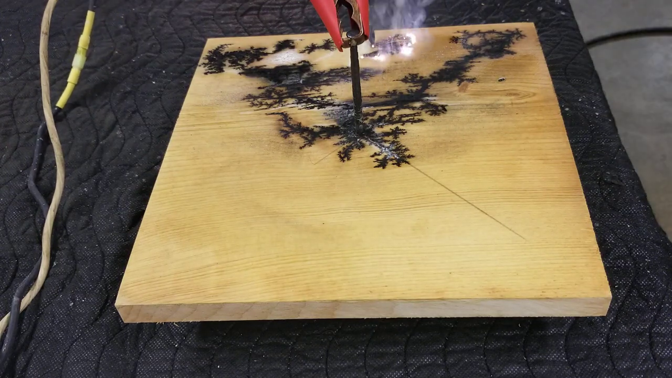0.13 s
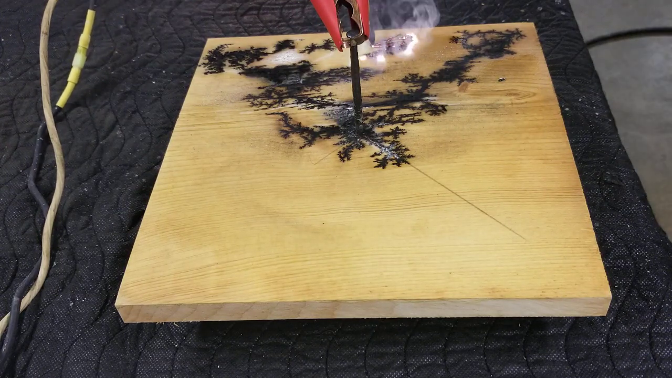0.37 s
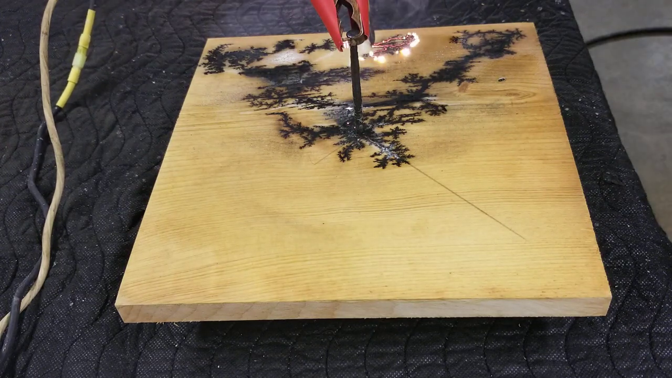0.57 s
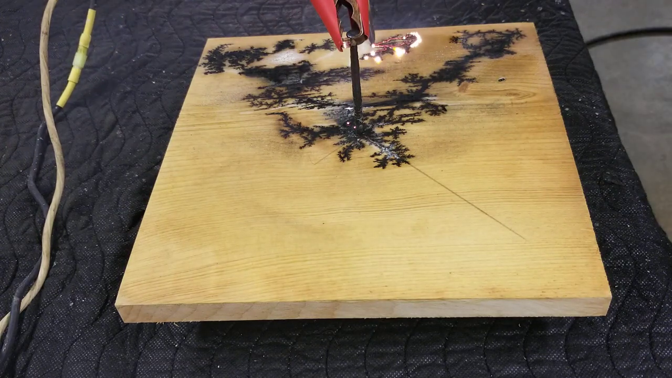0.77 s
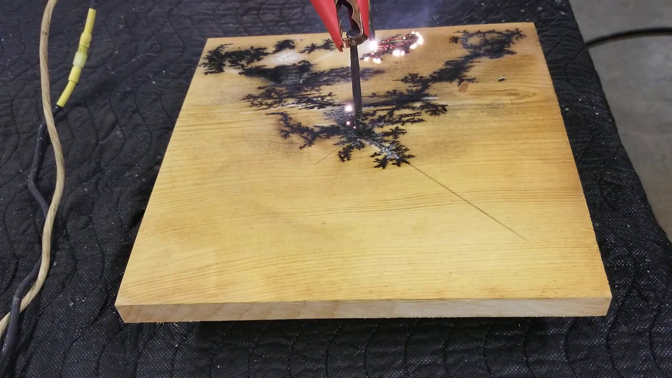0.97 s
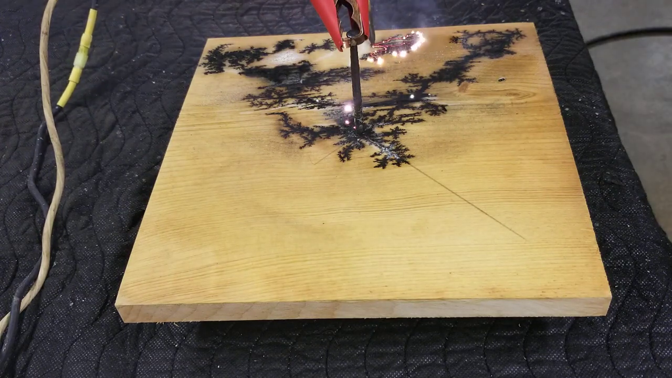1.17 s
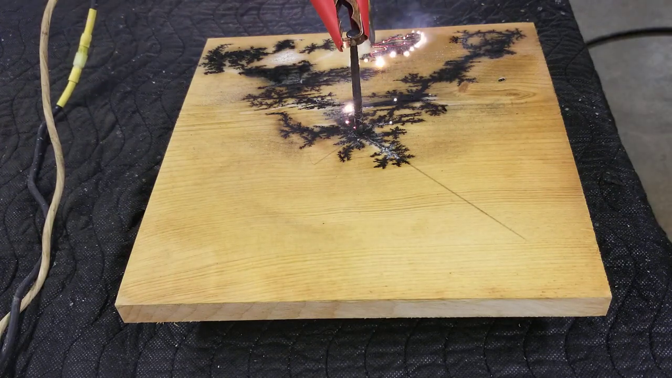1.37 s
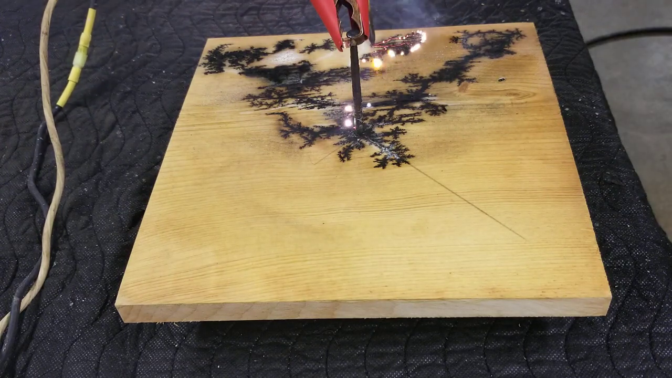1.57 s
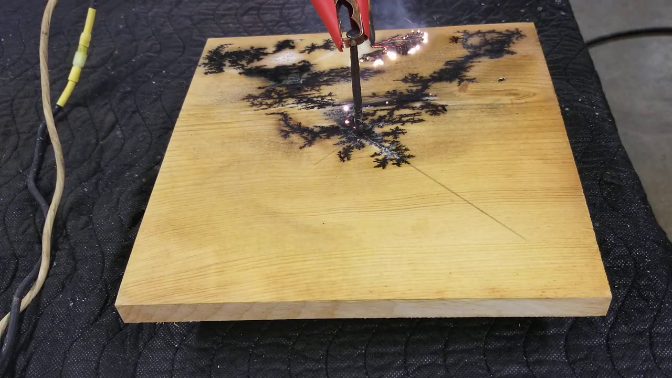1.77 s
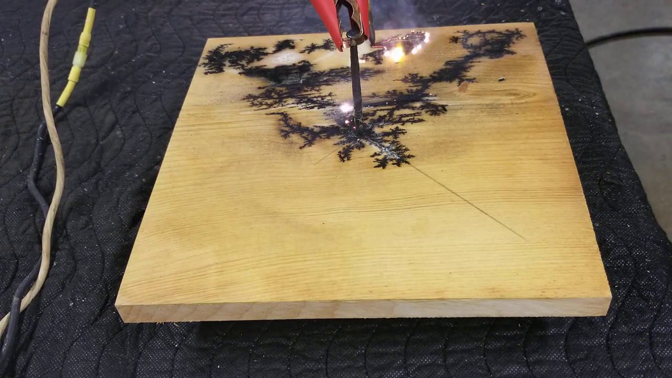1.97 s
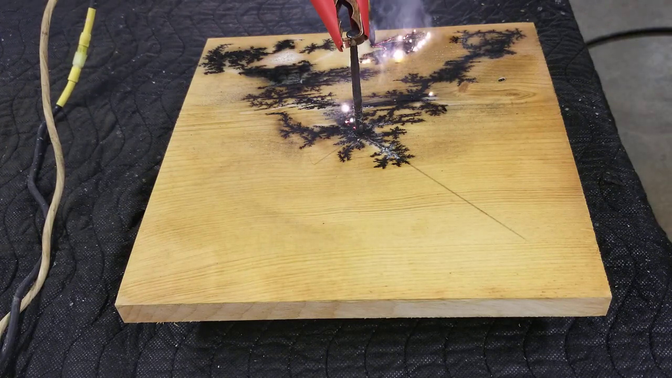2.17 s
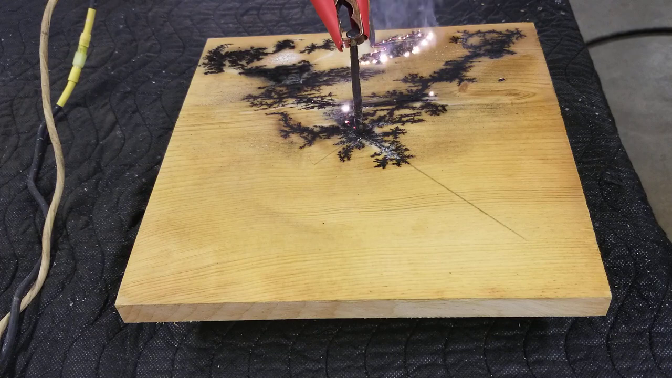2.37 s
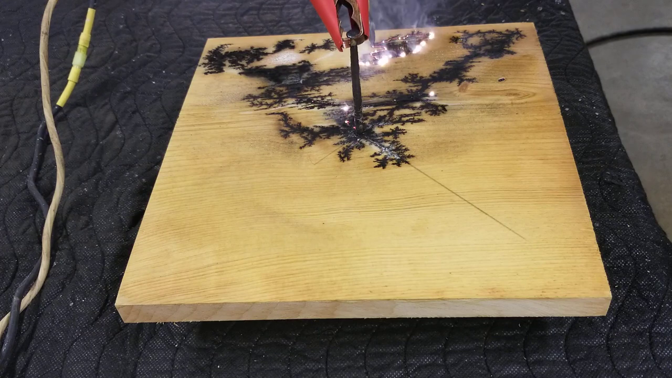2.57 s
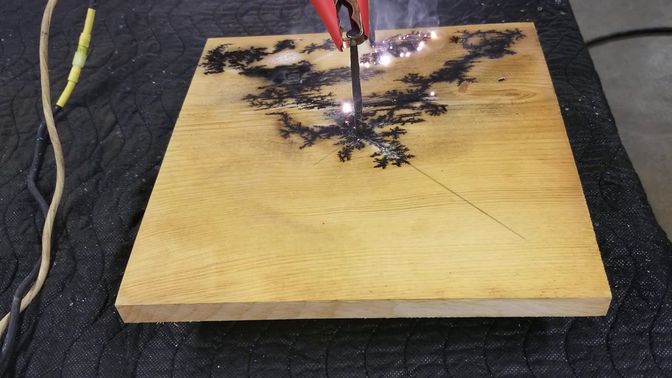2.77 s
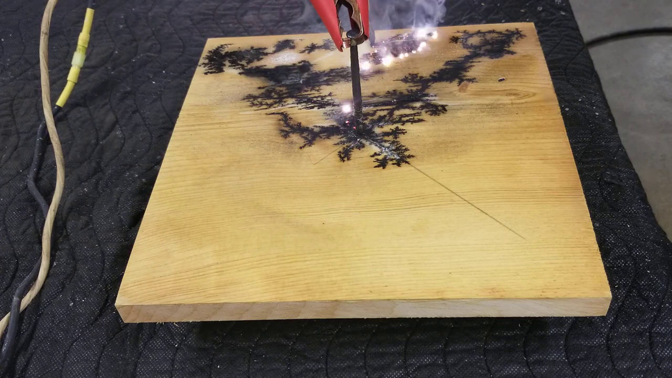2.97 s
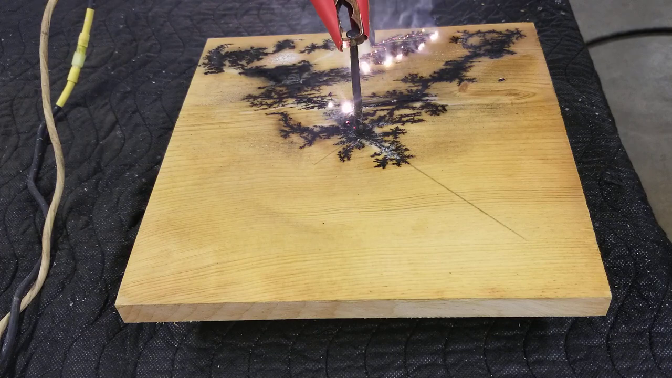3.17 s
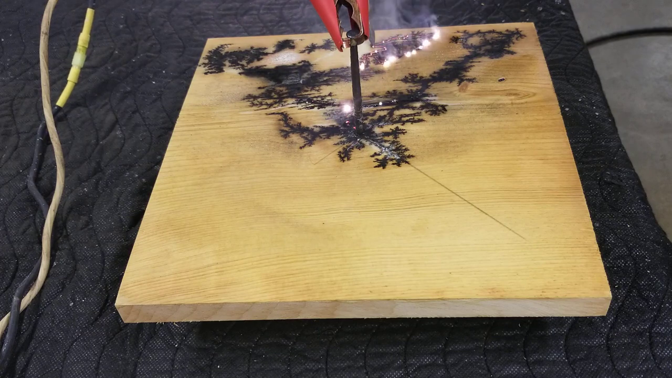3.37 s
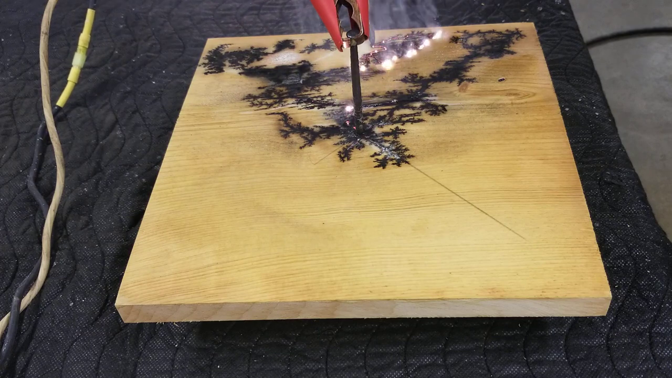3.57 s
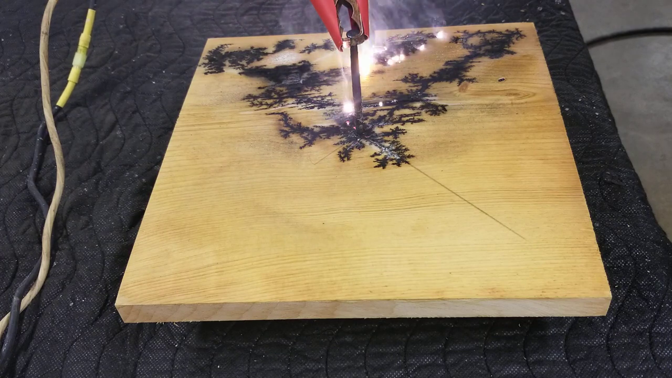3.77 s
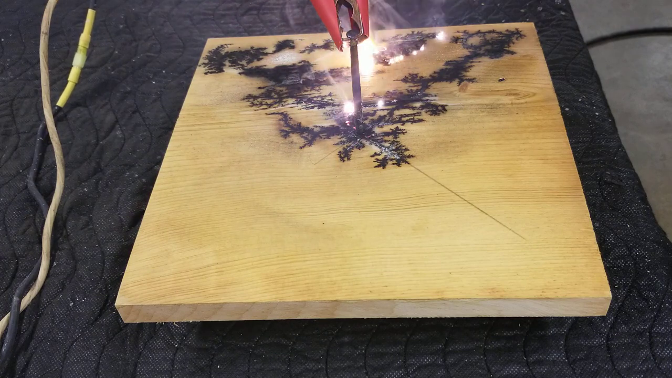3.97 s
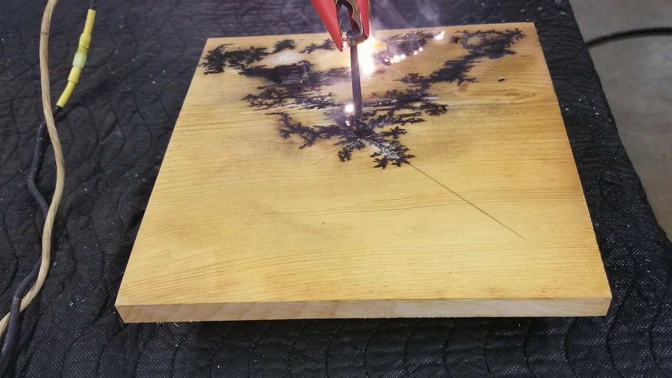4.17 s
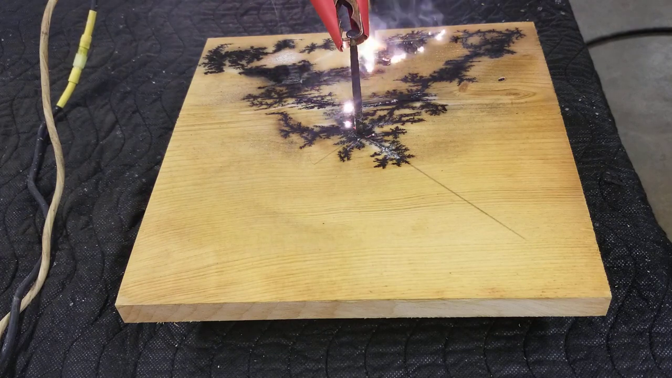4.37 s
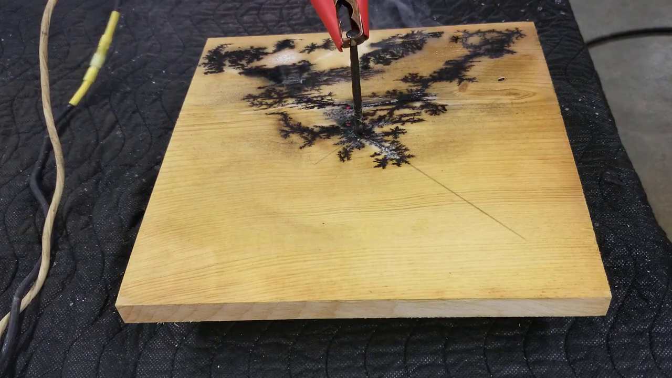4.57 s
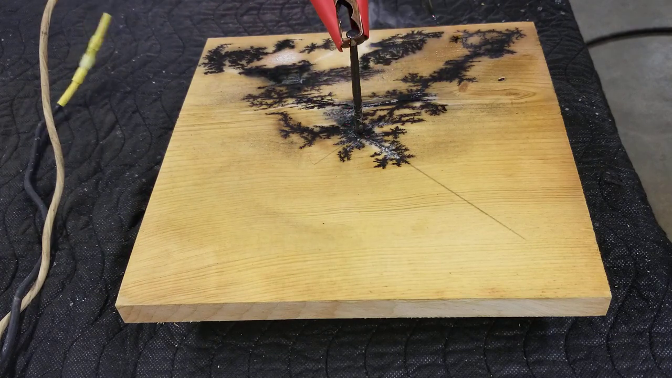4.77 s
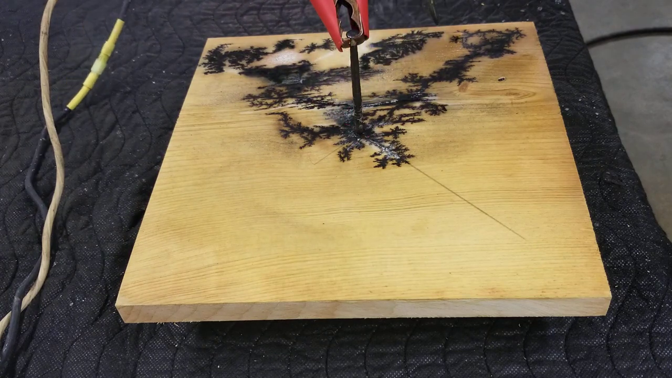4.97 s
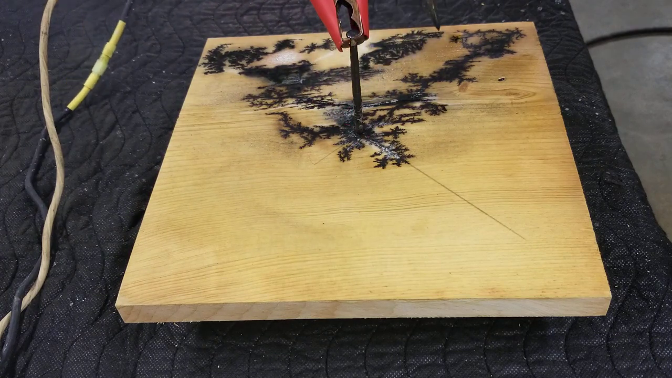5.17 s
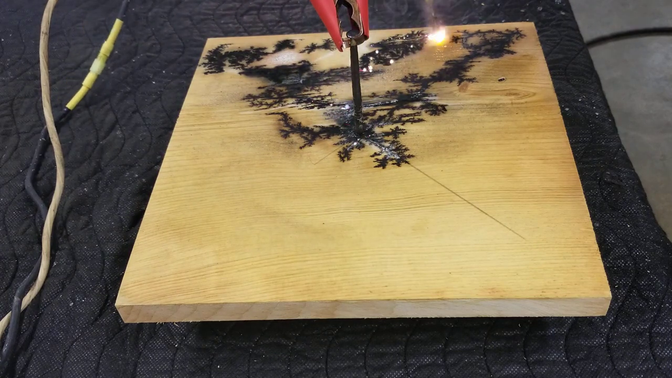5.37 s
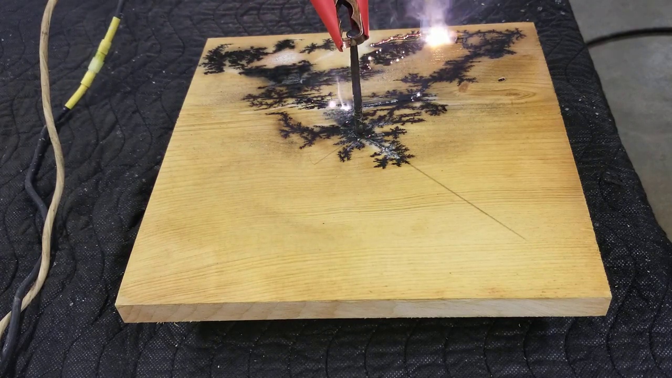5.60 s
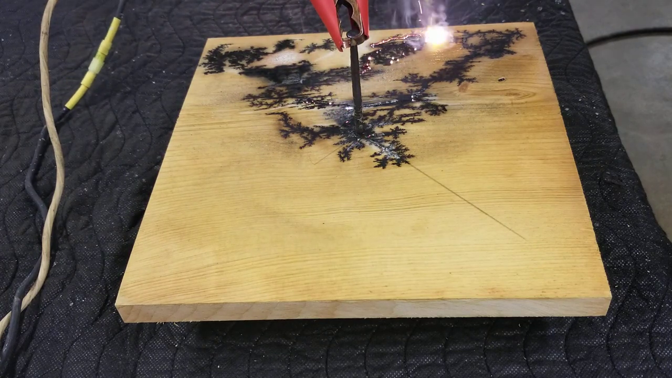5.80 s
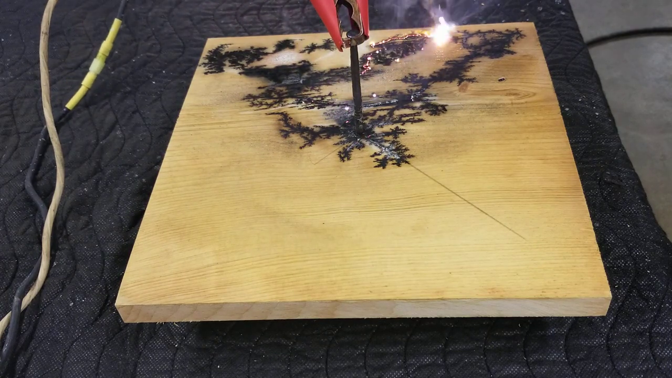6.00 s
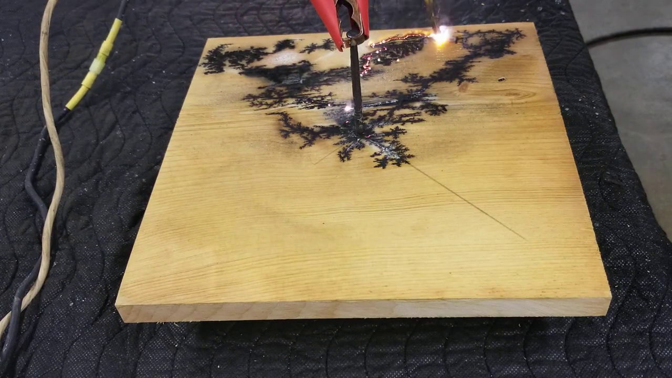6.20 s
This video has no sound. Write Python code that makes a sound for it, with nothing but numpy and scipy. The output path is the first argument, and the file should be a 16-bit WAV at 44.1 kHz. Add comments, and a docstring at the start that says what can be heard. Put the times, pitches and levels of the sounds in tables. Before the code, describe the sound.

From the start, wet wood under high voltage gives a harsh, very bright fizzing buzz: bursts of tiny clicks repeating about sixty times a second, each slightly different. Near 0.2 s an open arc briefly snaps and drones; around 0.5 s the sizzle swells, dips near 1 s, then flares repeatedly until 2 s, with isolated steam cracks near 1.3, 1.8, 2.8 and 3.5 s. From about 3.6 to 4.4 s the fizz thins while rough arc sputter and low buzzing drone come forward. At 4.4 s the burning cuts out, leaving softer transformer hum and two steady, gently beating fans with airflow. At 5.23 s it catches with a short buzzing thump, strong fizz and several hard cracks, then keeps crackling unevenly with arc snaps, pops and flares to the end, around 6.3 s. Close stereo pickup, the hiss brighter on the left, with a short, faint workshop reverberation.

```python
"""A small workshop, where mains high voltage burns branching tracks into a wet pine board.
Once a mains cycle the damp track spits a burst of tiny sparks: random clicks coloured as fizz and crackle.
Open arcs snap and sputter in bursts of clicks and drone at mains harmonics; steam pockets crack.
The track goes out for a moment, then catches again with a short buzzing thump.
Behind it a transformer hums in mains harmonics under its load, and two fans run as tones over noise."""
import sys
import numpy as np
from scipy import signal
from scipy.fft import rfft, irfft
from scipy.io import wavfile
from scipy.ndimage import uniform_filter1d

SR = 44100
rng = np.random.default_rng(int(sys.argv[2]) if len(sys.argv) > 2 else 0)


def persist_wave(psi):
    """Save psi, clipped to +-1, as 16-bit WAV."""
    counts = np.round(np.clip(psi, -1, 1) * 32767).astype(np.int16)
    wavfile.write(sys.argv[1], SR, np.atleast_2d(counts).T)


N = 275184

# Motor and fan blade tones: (frequency [Hz], mean level [dB])
FAN_TONES = [(55.05, -70), (56.23, -61.5), (58.59, -63), (101.8, -66), (112.46, -64), (435.04, -56),
             (449.72, -60), (543.84, -67), (562.13, -70), (618.66, -76.5), (870.12, -78.5), (1087.64, -74),
             (1124.27, -75), (1413.96, -76)]
# Rush of air from the fans: (frequency [Hz], density [dB per Hz])
AIR_RUSH = [(20, -86), (45, -97), (80, -78), (115, -73.5), (165, -83.5), (265, -75), (330, -81.5),
            (420, -78.5), (720, -87.5), (950, -89), (1120, -90.5), (1300, -92), (2200, -96.5), (3600, -100),
            (7500, -112), (9600, -108), (15500, -113)]
# Transformer hum, a row per mains harmonic from the second up: (level at load 0 [dB], level at load 1 [dB])
HUM_HARMONICS = [(-51, -44), (-66, -70), (-60, -55), (-90, -75.5), (-88, -70)]
# Spells in which the track conducts: (start [s], end [s], lag of left port [ms], left minus right [dB])
BURNS = [(0, 4.396, .057, -.8), (5.233, 6.3, .091, -2.1)]
# How hard the track burns: (time [s], burning strength [dB])
BURN_STRENGTH = [(0.01, -0.9), (0.21, -7.1), (0.46, 4.5), (0.96, -4.5), (1.11, 4.5), (1.91, -0.4),
                 (2.26, -0.3), (2.41, -3.5), (2.61, 0.8), (2.71, -2.5), (2.81, 4), (3.36, 1.2), (3.56, 4.5),
                 (3.81, -7.5), (4.11, -0.5), (4.16, -5), (4.31, 1.5), (4.39, -3.5), (5.24, 7), (5.39, -1),
                 (5.49, -0.7), (6.04, -4.5), (6.09, -0.7), (6.23, -5.5)]
# Brief flares as the track reaches a wet spot, a few of them dips: (time [s], extra strength [dB])
FLARES = [(.239, 7), (.339, 1.5), (.672, -1.5), (1.089, 0.5), (1.289, 6), (1.49, 4), (1.556, 6),
          (1.756, 5.5), (1.79, 7.5), (1.856, 5), (2.257, 3.5), (2.79, -1), (5.441, 3.5), (5.491, 5),
          (5.592, 4.5), (5.775, 6), (6.008, 6.5), (6.092, 3)]
# Open arc, before the trims of snap and drone: (time [s], forward half cycle [dB], reverse half cycle [dB])
ARC_STRENGTH = [(.18, -72, -76), (.21, -64, -53), (.32, -72, -62), (.5, -71.5, -61.5), (3.45, -77, -71),
                (3.65, -57.5, -61), (4.2, -62, -57.5), (4.35, -62, -63), (5.24, -65, -64),
                (5.5, -94, -57.5), (6.24, -89, -70)]
# Pockets of steam bursting in the char: (time [s], click size before colouring [dB])
STEAM_CRACKS = [(1.2912, -20.5), (1.8396, -17.5), (2.8238, -21), (3.5069, -20), (5.258, -14),
                (5.2753, -11.5), (5.3249, -27), (5.5081, -14.5), (5.5748, -24), (5.975, -21), (6.058, -20),
                (6.1577, -18)]
# Colour of the steam cracks: (frequency [Hz], gain [dB])
CRACK_COLOUR = [(100, 3), (400, -17), (1500, 6), (3500, 5), (7000, 7.5), (16000, 13.5)]
# Colour of the escaping steam, before scaling: (frequency [Hz], relative gain [dB])
FIZZ_COLOUR = [(600, -26.5), (2000, -29.5), (5000, -12), (8000, -11), (8700, -7), (9450, -3), (10300, -1),
               (11600, -1), (13000, 1), (15600, 1.5), (16500, -46)]
# Colour of the crackling char, before scaling: (frequency [Hz], relative gain [dB])
CRACKLE_COLOUR = [(200, -10), (700, -13), (1150, 1.5), (1700, 2.5), (2300, 2.5), (2750, 0), (3300, 3.5),
                  (4500, -1), (7000, -4), (10000, -25), (16000, -14)]
# Colour of the arc snaps, before scaling: (frequency [Hz], relative gain [dB])
SNAP_COLOUR = [(150, -9.5), (500, -17.5), (1100, -4), (1600, -3), (2500, -7.5), (5000, -13), (9000, -6.5),
               (16000, 1)]
# Balance of the microphone ports, the left ringing near 9.5 kHz: (frequency [Hz], left minus right [dB])
PORT_BALANCE = [(60, 0.5), (120, 1.6), (220, 0.5), (420, 4.5), (1200, 4), (2400, 2), (5000, 3.5),
                (8000, -0.5), (8700, 6), (9450, 18), (10400, 7.5), (11600, 5.5), (13000, 3.5), (15500, 5.5)]

MAINS_HZ = 59.972
FIRST_PEAK_S = .0056  # first voltage peak
TIME = np.arange(N) / SR
FREQ = np.maximum(np.arange(N // 2 + 1) * SR / N, 1)
RELIGHT_S = BURNS[1][0]
RELIT = TIME >= RELIGHT_S

FIZZ_DB, CRACKLE_DB = -39.5, -55  # base levels, before burning strength and scatter
CRACKLE_SLOPE = .67  # dB of crackle for each dB of burning strength
RELIGHT_CRACKLE_DB = 3  # the second burn crackles harder
FLICKER_DB, RELIGHT_FLICKER_DB = 1.07, 2.1  # scatter from cycle to cycle in the first and second burn
FLARE_S = 0.0024  # half length of a flare
LOAD, RELIGHT_LOAD = 0.5, 0.39  # base load in the first and second burn
LOAD_PER_DB = 0.05  # load added per dB of burning
LOAD_SMOOTHING_S = .06  # length of the smoothing of the load
INRUSH_DB, INRUSH_SLOPE_DB = -48, -1  # second harmonic before the swell; step to each next harmonic
INRUSH_S = 0.021  # decay time to 1/e
EARLY_T60_S, ROOM_T60_S, TREBLE_T60_S = 0.066, 0.32, .3
TOP_HZ = 15900


def undb(db):
    """Decibels to gain."""
    return 10 ** (np.asarray(db) / 20)


def curves(table):
    """Each column of a table after the time, drawn as a curve in time."""
    s, *columns = np.transpose(table)
    return [np.interp(TIME, s, column) for column in columns]


def response(points):
    """Gain at every frequency, joining the points on a log frequency scale."""
    hz, db = np.transpose(points)
    return undb(np.interp(np.log(FREQ), np.log(hz), db))


def colour(x, gain):
    """Minimum-phase filter with the given gains: clicks ring after, never before."""
    cepstrum = irfft(np.log(gain), N)
    # fold the backward half onto the forward half
    cepstrum[1:N // 2] *= 2
    cepstrum[N // 2 + 1:] = 0
    return irfft(rfft(x) * np.exp(rfft(cepstrum)), N)


def in_band(points, lo, hi):
    """A colour scaled so that its mean square over the whole spectrum, counting only lo to hi, is 1."""
    gain = response(points)
    inside = (FREQ > lo) * (FREQ < hi)
    return gain / np.sqrt(np.mean(gain ** 2 * inside))


def unit(x):
    """Scale to rms 1."""
    return x / np.sqrt(np.mean(x ** 2))


def delay(x, ms):
    """Delay by any fraction of a sample."""
    return irfft(rfft(x) * np.exp(-2j * np.pi * FREQ * ms / 10 ** 3), N)


def walk(rate):
    """Slow random drift of rms 1, heading for a new value rate times a second."""
    k = int(SR / rate)
    steps = np.repeat(rng.standard_normal(N // k + 2), k)
    return unit(uniform_filter1d(steps, k)[:N])


def per_cycle():
    """One random value held through each mains cycle."""
    cycle = ((TIME - FIRST_PEAK_S) * MAINS_HZ + .5).astype(int)
    return rng.standard_normal(cycle[-1] + 1)[cycle]


def window(after_ms, width_ms, jitter_ms):
    """A bell once a mains cycle, a given time after the voltage peak."""
    centre_s = (after_ms + jitter_ms * per_cycle()) / 10 ** 3
    turn = (TIME - FIRST_PEAK_S - centre_s) * MAINS_HZ
    away_ms = ((turn + .5) % 1 - .5) / MAINS_HZ * 10 ** 3
    return np.exp(-.5 * (away_ms / width_ms) ** 2)


def sparks(activity, rate, spread_db, apart):
    """Random pressure clicks, denser where activity is high; some reach only one port, scaled by apart."""
    chance = activity / activity.mean() * rate / SR
    sizes = undb(spread_db * np.minimum(rng.standard_normal((3, N)), 2))
    struck = rng.random((3, N)) < chance
    both, left, right = struck * sizes * rng.choice([-1, 1], (3, N))
    return unit(both + apart * np.array([left, right]))


def tone(hz, wobble):
    """A tone of rms 1 whose phase wanders by about wobble radians."""
    phase = 2 * np.pi * (hz * TIME + rng.random())
    return np.sqrt(2) * np.sin(phase + wobble * walk(3.02))


def mains_tone(order, turn, wobble):
    """A wandering mains harmonic of rms 1, that part of a turn into its sine at the first voltage peak."""
    phase = 2 * np.pi * (order * MAINS_HZ * (TIME - FIRST_PEAK_S) + turn)
    return np.sqrt(2) * np.sin(phase + wobble * walk(3.0))


def fans():
    """Beating motor and blade tones over rushing air, whose bass is alike at both ports."""
    tones = sum(tone(hz, wobble=0.25) * undb(db + 0.78 * walk(6)) for hz, db in FAN_TONES)
    mid, side = rfft(rng.standard_normal((2, N)) * undb(0.18 * walk(3.5)))
    alike = 1 / (1 + (FREQ / 600) ** 2)
    air = np.sqrt(1 + alike) * mid + np.sqrt(1 - alike) * side * np.array([[1], [-1]])
    # the last factor turns density per Hz into signal level
    rush = irfft(air * response(AIR_RUSH), N) * np.sqrt(SR) / 2
    return tones + rush


def current(arc_load=0.59):
    """Load on the transformer: none while the track is out, more as it burns harder or an open arc stands."""
    burn_db, = curves(BURN_STRENGTH)
    arcing = undb(curves(ARC_STRENGTH)[0])
    base = np.where(RELIT, RELIGHT_LOAD, LOAD)
    load = base + LOAD_PER_DB * burn_db + arc_load * arcing / arcing.max()
    conducts = sum((TIME >= start) & (TIME < end) for start, end, _, _ in BURNS)
    return uniform_filter1d(load * conducts, int(LOAD_SMOOTHING_S * SR))


def transformer():
    """The core hums at mains harmonics, whose levels move with the current the track draws."""
    load = current()
    hum = 0
    for k, (idle_db, loaded_db) in enumerate(HUM_HARMONICS):
        size = undb(idle_db) + load * (undb(loaded_db) - undb(idle_db))
        hum = hum + size * mains_tone(k + 2, turn=0, wobble=0.029)
    return hum


def inrush(count=6):
    """As the track catches again, the sudden current jolts the transformer core: a short buzzing thump."""
    age = np.maximum(TIME - RELIGHT_S, 0)
    swell = np.minimum(age / .003, 1) * np.exp(-age / INRUSH_S)
    buzz = 0
    for k in range(count):
        level = undb(INRUSH_DB + INRUSH_SLOPE_DB * k)
        buzz = buzz + level * mains_tone(k + 2, turn=0, wobble=0.37)
    return swell * buzz


def arc_drone(odd_db=-2, even_db=0):
    """Hot arc swelling with the current: uneven half cycles drone at harmonic 3, the forward one at 4."""
    forward, reverse = undb(curves(ARC_STRENGTH))
    odd = undb(odd_db) * np.abs(reverse - forward) * mains_tone(3, turn=1 / 4, wobble=.06)
    even = undb(even_db) * forward * mains_tone(4, turn=1 / 4, wobble=.06)
    return odd + even


def cracks():
    """Now and then a pocket of steam bursts with one hard, broad click."""
    clicks = np.zeros(N)
    for s, db in STEAM_CRACKS:
        clicks[int(s * SR)] -= undb(db)
    return colour(clicks, response(CRACK_COLOUR))


def arc():
    """The open arc restrikes with a snap in each half cycle; a broader sputter leads into the reverse snap."""
    forward_db, reverse_db = curves(ARC_STRENGTH)
    forward_window = window(after_ms=2.85, width_ms=.2, jitter_ms=.15)
    reverse_window = window(after_ms=-5.5, width_ms=.25, jitter_ms=.2)
    sputter_window = window(after_ms=8.7, width_ms=1.3, jitter_ms=.3)
    forward = sparks(forward_window, rate=600, spread_db=6, apart=1.0)
    reverse = sparks(reverse_window, rate=980, spread_db=6.5, apart=0.25)
    sputter = sparks(sputter_window, rate=2500, spread_db=2, apart=.4)
    forward_snaps = forward * undb(forward_db + 5.0)
    reverse_bursts = (reverse + undb(0.5) * sputter) * undb(reverse_db - 2.0)
    return colour(forward_snaps + reverse_bursts, in_band(SNAP_COLOUR, 900, 6000))


def flares():
    """Change of burning strength in dB as the track flares at wet spots."""
    return sum(db * np.exp(-((TIME - s) / FLARE_S) ** 4) for s, db in FLARES)


def track(fizz_scatter_db=0.72, crackle_scatter_db=.9):
    """Steam fizzes and char crackles at one voltage peak, far less at the opposite one."""
    burn_db, = curves(BURN_STRENGTH)
    # no two cycles burn equally hard
    flicker_db = flares() + np.where(RELIT, RELIGHT_FLICKER_DB, FLICKER_DB) * per_cycle()
    fizz_db = FIZZ_DB + burn_db + flicker_db + fizz_scatter_db * per_cycle()
    crackle_db = CRACKLE_DB + CRACKLE_SLOPE * burn_db + RELIGHT_CRACKLE_DB * RELIT
    crackle_db = crackle_db + flicker_db + crackle_scatter_db * per_cycle()
    forward = window(after_ms=-.1, width_ms=.88, jitter_ms=.25)
    # half a mains cycle later
    reverse = window(after_ms=500 / MAINS_HZ, width_ms=2.0, jitter_ms=.4)
    # steam keeps escaping for a few ms after the peak
    steam = window(after_ms=2.7, width_ms=2.4, jitter_ms=0.96)
    fizz_activity = forward + undb(-24.5) * steam + undb(-36) * reverse
    crackle_activity = forward + undb(-20) * reverse + undb(-28)
    fizz = sparks(fizz_activity, rate=5500, spread_db=5.0, apart=0.79)
    crackle = sparks(crackle_activity, rate=2200, spread_db=5, apart=0.62)
    fizz = colour(fizz * undb(fizz_db), in_band(FIZZ_COLOUR, 8500, 16000))
    crackle = colour(crackle * undb(crackle_db), in_band(CRACKLE_COLOUR, 900, 6000))
    return fizz + crackle


def board():
    """Each burn sits at its own place on the board, with its own lag and balance between the ports."""
    left, right = track() + arc() + cracks()
    out = 0
    for start, end, lag_ms, pan_db in BURNS:
        heard = np.array([delay(left, lag_ms) * undb(pan_db / 2), right * undb(-pan_db / 2)])
        out = out + heard * (TIME >= start) * (TIME < end)
    return out


def workshop(x, echo_ms, echo_db, early_db, tail_db, treble_tail_db, count=6):
    """A single echo, and a dense reverberation whose early part dies fast and whose tail is softer."""
    t = TIME[:SR // 2]
    split = signal.butter(2, 6000, fs=SR)
    # the burning spot hops from cycle to cycle, and each spot has its own paths round the room
    spot = (np.abs(per_cycle()) * 10 ** 3).astype(int) % count
    wet = 0
    for k in range(count):
        paths = rng.standard_normal((2, len(t))) * (t > .004)
        dull = signal.filtfilt(*split, paths)
        early = paths * undb(early_db - 60 * t / EARLY_T60_S)
        tail = dull * undb(tail_db - 60 * t / ROOM_T60_S)
        treble_tail = (paths - dull) * undb(treble_tail_db - 60 * t / TREBLE_T60_S)
        wet = wet + signal.fftconvolve(x * (spot == k), early + tail + treble_tail, axes=1)[:, :N]
    echo = undb(echo_db) * delay(x, echo_ms)
    return x + echo + wet


def scene():
    """The burning board in its room, over arc drone, transformer and fans."""
    background = fans() + transformer() + inrush()
    burning = workshop(board(), echo_ms=4.7, echo_db=-20, early_db=-33.5, tail_db=-35.5,
                       treble_tail_db=-40.5)
    return background + arc_drone() + burning


def record(dry):
    """Each microphone port has its own colour; the top is cut."""
    tilt = np.sqrt(response(PORT_BALANCE))  # half the difference goes to each port
    ports = np.array([colour(dry[0], tilt), colour(dry[1], 1 / tilt)])
    top_cut = signal.ellip(10, .2, 70, TOP_HZ, fs=SR, output="sos")
    return signal.sosfilt(top_cut, ports)


dry = scene()
out = record(dry)
persist_wave(out)
```